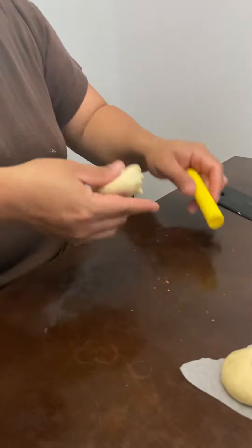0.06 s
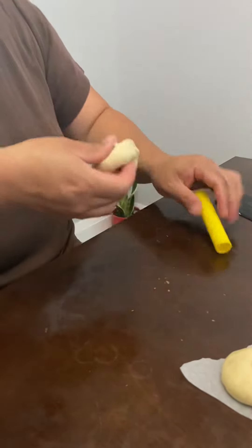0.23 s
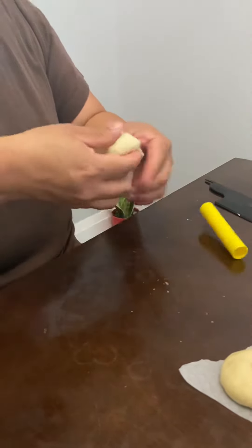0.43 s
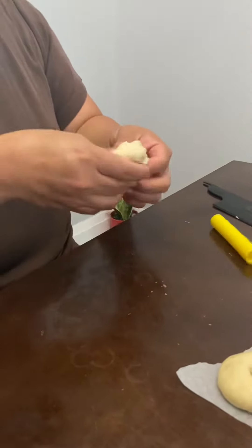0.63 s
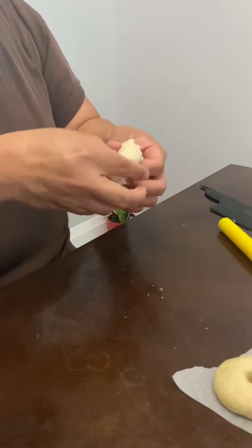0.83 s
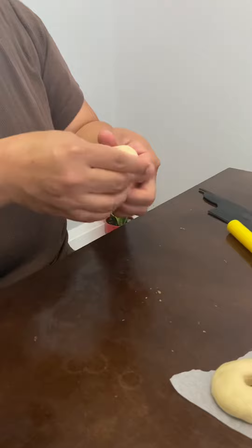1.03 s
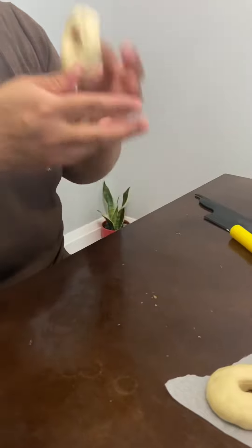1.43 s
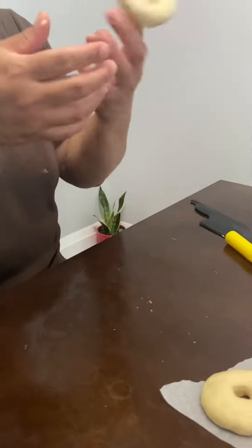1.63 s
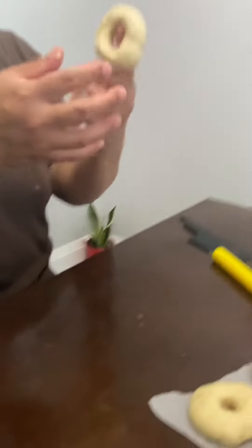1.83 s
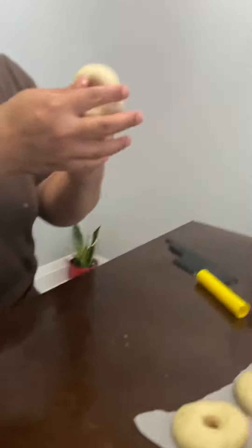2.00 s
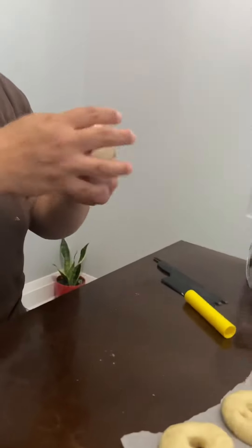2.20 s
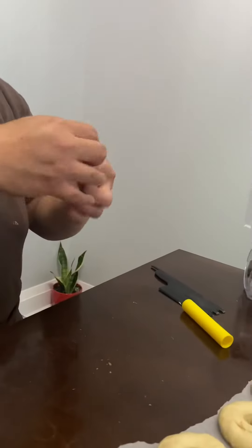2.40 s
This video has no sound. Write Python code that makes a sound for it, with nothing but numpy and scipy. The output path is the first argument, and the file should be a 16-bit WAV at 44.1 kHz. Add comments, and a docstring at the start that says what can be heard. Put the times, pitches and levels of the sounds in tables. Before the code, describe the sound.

A knife is set down on a wooden table and rocks with quickening clacks, its round handle rolling until it stops. Faint taps and a tiny sticky click of fingers on dough follow, in a small, humming room.

```python
"""Knife rocking on a wooden table

In a small, bare room, heard by a stereo microphone pair, a hard-handled knife is set down and rocks
ever faster until it lies still. Each contact thumps the tabletop, clacks the handle and rings the
blade; in between, the round handle rolls. Faint taps and fingers on dough follow over the room's hum."""
import sys
import numpy as np
from scipy import signal
from scipy.fft import rfft, irfft, next_fast_len
from scipy.io import wavfile
from scipy.ndimage import map_coordinates

SR = 44100
rng = np.random.default_rng(int(sys.argv[2]) if len(sys.argv) > 2 else 0)


def transcribe(u):
    """Save the signal u as a 16-bit wav file named by the first command-line argument.

    u: samples, shape (n,) or (channels, n), limited to [-1, 1]; the rate is SR.
    q: integer samples, one column per channel.
    """
    v = np.clip(np.atleast_2d(u).T, -1, 1)
    q = np.round(v * 32767).astype(np.int16)
    wavfile.write(sys.argv[1], SR, q)


N = 112454
HIT_SAMPLES = 32768


def amp(db):
    """Decibels to gain."""
    return 10 ** (np.asarray(db) / 20)


def unit(x):
    """Scale to rms 1."""
    return x / np.sqrt(np.mean(x ** 2) + 1e-20)


def along(points, hz):
    """Read a curve of (freq_hz, value) points on a log frequency axis."""
    freqs, values = np.transpose(points)
    return np.interp(np.log(hz + 1), np.log(np.abs(freqs) + 1), values)


def filtered(x, response):
    """Filter x by a gain given as a function of frequency."""
    n = x.shape[-1]
    padded = next_fast_len(n + 8192)
    return irfft(rfft(x, padded) * response(np.fft.rfftfreq(padded, 1 / SR)), padded)[..., :n]


def add(track, start_s, sound):
    """Mix a sound into the track."""
    part = track[..., round(start_s * SR):][..., :sound.shape[-1]]
    part += sound[..., :part.shape[-1]]


# How alike the room sounds at the two microphones: freq_hz, correlation
ROOM_COHERENCE = [(100, 1), (300, 0.92), (450, .9), (700, 0.2), (1200, 1), (2400, 0.38), (3600, 0.34),
                  (4400, .5), (5600, 1), (10000, .96)]
def stereo_noise(spectrum, samples):
    """Coloured noise, as alike left and right as the room makes it."""
    def mid_side_gains(hz):
        angle = np.arccos(np.clip(along(ROOM_COHERENCE, hz), -1, .999)) / 2
        return amp(along(spectrum, hz)) * [np.cos(angle), np.sin(angle)]
    mid, side = filtered(rng.standard_normal((2, samples)), mid_side_gains)
    return np.array([mid + side, mid - side])


# Ventilation in the background: freq_hz, relative_db
VENT_SPECTRUM = [(15, -46), (25, -24.5), (34, -9.5), (70, -7.5), (100, -12), (132, 2), (166, -10),
                 (200, -12.5), (260, -12.5), (344, -21.5), (427, -19), (530, -28), (700, -29.5),
                 (1370, -46), (2800, -55), (4500, -54.5), (7300, -63.5), (10500, -60), (13000, -67.5),
                 (16000, -77)]
# Hum lines of the room: pitch_hz, level_db
HUM_LINES = [(75, -64.5), (124, -57), (199, -66)]
def room_tone():
    """Low ventilation rumble with a few hum lines that waver in level and phase."""
    t = np.arange(N) / SR
    out = amp(-51) * unit(stereo_noise(VENT_SPECTRUM, N))
    for hz, db in HUM_LINES:
        waver_db, drift_rad = (map_coordinates(rng.standard_normal(64), [t * 6]) for _ in range(2))
        out += amp(db - waver_db) * np.sqrt(2) * np.sin(2 * np.pi * hz * t + drift_rad)
    return out


# Decay of the small, bare room: freq_hz, t60_s
ROOM_DECAY = [(120, 0.9), (450, .45), (1400, 0.46), (3600, 0.35), (6000, 0.37), (10000, .34), (16000, 0.48)]
# Colour of its tail at the microphones: freq_hz, relative_db
TAIL_SPECTRUM = [(120, 0), (420, -8), (750, -1.5), (1200, -6.5), (2200, 2), (3100, -5.5), (4400, -3),
                 (5100, -5), (5800, -9.5), (6600, -6), (7300, -13), (9200, -12.5), (12000, -12),
                 (13600, -10), (15200, -10), (16200, -16)]
def in_room(sound, build_s=.007, wall_delay_s=.012, wall_db=-13.5):
    """The direct sound, a reflection off one near wall and a diffuse tail."""
    _, _, bands = signal.stft(stereo_noise(TAIL_SPECTRUM, HIT_SAMPLES), SR, nperseg=256)
    hz = np.linspace(0, SR / 2, bands.shape[1])
    t = np.linspace(0, HIT_SAMPLES / SR, bands.shape[2])
    t60 = along(ROOM_DECAY, hz)[:, None]
    equal_energy = np.sqrt(2 * np.log(1000) / (t60 * SR))
    fade = amp(-60 * t / t60) * equal_energy * (1 - np.exp(-t / build_s))
    tail = signal.istft(bands * fade, SR, nperseg=256)[1]
    wet = signal.fftconvolve(sound, tail, axes=1)[:, :HIT_SAMPLES]
    add(wet, wall_delay_s, amp(wall_db) * sound)
    return sound + wet


def ring(modes, spread_rad, scatter_db=1.5, attack_s=.0002):
    """Struck modes, a little different at each blow; each reaches the two microphones out of step."""
    t = np.arange(HIT_SAMPLES) / SR
    hz, db, t60 = np.transpose(modes)[:, :, None]
    polarity = (-1) ** np.arange(len(hz))[:, None]
    strength = polarity * amp(db + scatter_db * rng.standard_normal(hz.shape))
    fade = strength * amp(-60 * t / t60) * (1 - np.exp(-t / attack_s))
    skew = spread_rad * rng.standard_normal(hz.shape)
    return np.array([np.sum(fade * np.sin(2 * np.pi * hz * t + side * skew), 0) for side in (1, -1)])


def burst(spectrum, t60_s, rise_s=.0003):
    """A quickly rising and dying puff of coloured noise, its energy set by its decay."""
    t = np.arange(HIT_SAMPLES) / SR
    fade = amp(-60 * t / t60_s)
    puff = stereo_noise(spectrum, HIT_SAMPLES) * fade * (1 - np.exp(-t / rise_s))
    return unit(puff) * np.sqrt(np.mean(fade ** 2))


# Hands brushing dough, barely reaching the microphones: middle_s, length_s, level_db
RUB_STROKES = [(1.32, 0.052, -86), (1.48, 0.1, -82.5), (2.116, 0.15, -83), (2.34, .1, -87.5),
               (2.456, 0.062, -84.5)]
# Colour of the rustle: freq_hz, relative_db
RUB_SPECTRUM = [(500, -11), (1200, -4), (2500, 4), (3600, -13.5), (7000, -11.5), (10500, -9), (15500, -13)]
def dough_rubs(grain_db=2.5, grains_per_s=150):
    """Hands rub the dough in soft swells of grainy noise."""
    t = np.arange(N) / SR
    strokes = sum(amp(db) * np.exp(-(2 * (t - middle_s) / length_s) ** 2)
                  for middle_s, length_s, db in RUB_STROKES)
    grain = amp(grain_db * map_coordinates(rng.standard_normal(2048), [t * grains_per_s]))
    return strokes * unit(grain * stereo_noise(RUB_SPECTRUM, N))


# Fingers on the dough: start_s, level_db
STICKY_CLICKS = [(1.710, -79.5), (1.7290, -52), (1.733, -68.5)]
# Colour of a click: freq_hz, relative_db
CLICK_SPECTRUM = [(500, -22.5), (4000, -21), (6000, -8), (9000, 0), (12000, -1), (16000, -15)]
def finger_clicks():
    """Fingers stick to the dough with tiny bright clicks."""
    out = np.zeros((2, N))
    for start_s, db in STICKY_CLICKS:
        add(out, start_s, in_room(amp(db) * burst(CLICK_SPECTRUM, t60_s=.0046)))
    return out


# Resonances of the wooden tabletop: pitch_hz
TABLETOP_HZ = [126, 160, 283, 351, 412, 470, 623, 739, 885]
# How each one rings: pitch_hz, relative_db, t60_s
TABLETOP_MODES = list(zip(TABLETOP_HZ, [-19, -18, -13, -11, -2, -7, -16, -16, -15],
                  [.12, .1, .11, .06, .05, .07, .09, .11, .05]))
def tabletop_thump():
    """A blow sets the low modes of the tabletop ringing."""
    return ring(TABLETOP_MODES, spread_rad=.15)


# Resonances of the hard handle: pitch_hz
HANDLE_HZ = [1099, 1200, 1365, 1436, 1532, 1612, 1830, 1920, 2195, 2471]
# How each one rings: pitch_hz, relative_db, t60_s
HANDLE_MODES = list(zip(HANDLE_HZ, [-9, -9, -6, -9, -11, -10, -9, -13, -14, -13],
                [.04, .04, .015, .035, .03, .035, .018, .035, .03, .03]))
def handle_clack():
    """The handle rings briefly as it meets the wood."""
    return ring(HANDLE_MODES, spread_rad=.5)


# Rumble of the handle on the table: freq_hz, relative_db
RUMBLE_SPECTRUM = [(40, -24.5), (90, -1), (160, -2), (210, -5.5), (300, 0.5), (460, -3.5), (600, -6),
                   (900, -12.5), (2500, -36), (8000, -69)]
def rolling(start_s=.235, stop_s=.82, fade_s=.015, jolts_per_s=190, scatter_db=4, growth_db_per_s=4):
    """The round handle rumbles on the wood; tiny random jolts keep tabletop and handle murmuring."""
    t = np.arange(N) / SR
    moving = np.clip(np.minimum(t - start_s, stop_s - t) / fade_s, 0, 1)
    jolts = (rng.random(N) < jolts_per_s / SR) * amp(scatter_db * rng.standard_normal(N))
    jolt_sound = amp(-50.5) * tabletop_thump() + amp(-44) * handle_clack()
    rumble_db = -44 + growth_db_per_s * (t - start_s)
    rumble = moving * amp(rumble_db) * unit(stereo_noise(RUMBLE_SPECTRUM, N))
    murmur = signal.fftconvolve((moving * jolts)[None], in_room(jolt_sound), axes=1)[:, :N]
    return rumble + murmur


# Modes of the blade and of the hollow clink: pitch_hz, relative_db, t60_s
BLADE_MODES = [(5130, -8, 0.028), (5500, -5.5, 0.021), (5817, 0, 0.034), (12200, -6.5, 0.012)]
CLINK_MODES = [(2890, -4, 0.021), (3440, -1.5, 0.018), (3810, -11.5, .02)]
# Noise of a contact, its woody body and its sharp tick: freq_hz, relative_db
WOOD_SPECTRUM = [(30, -39), (100, -17.5), (400, -1), (800, -5), (1300, 1), (2300, -8.5), (2900, -16),
                 (3600, -15), (4500, -16.5), (8000, -22.5), (16000, -44.5)]
TICK_SPECTRUM = [(1000, -15.5), (3000, -7), (4300, -10), (5500, 6.5), (6600, -4), (7200, -3), (9200, -1),
                 (10500, -4), (12000, 6), (13800, -3), (15300, -3.5), (16500, -21)]
# At the table, faint handling taps and the rocking knife in the foreground; each level is relative
# within its column: start_s, thump_db, clack_db, clink_db, blade_db, tick_db
HANDLING_TAPS = [(1.1105, -46, -50.5, -83, -75, -89), (1.1283, -38, -46, -60, -68, -78)]
KNIFE_CONTACTS = [(.1575, -28.5, -27.5, -69, -55.5, -48), (.2042, -30.5, -32.5, -50, -57, -44),
                  (.2258, -15, -16, -22.5, -12.5, -18.5), (.2290, -29.5, -16, -33, -20.5, -23),
                  (.2600, -33, -32, -49, -36, -43), (.2995, -41.5, -32.5, -33, -42.5, -39),
                  (.3362, -50, -45, -60, -45.5, -47), (.3462, -22.5, -16.5, -43, -39.5, -35.5),
                  (.3481, -20.5, -21, -26, -23, -21), (.4407, -33.5, -17, -31, -20.5, -20),
                  (.5185, -25.5, -17, -24, -29, -25.5), (.5815, -27.5, -21.5, -29, -35, -24.5),
                  (.6346, -22, -23, -31, -40.5, -30.5), (.6797, -24, -24.5, -35, -34, -29),
                  (.7165, -27, -28.5, -36.5, -30, -46), (.7453, -38, -33.5, -34, -59, -40.5),
                  (.7686, -33.5, -34, -38, -49, -46.5), (.7835, -44, -29.5, -56, -44, -45.5),
                  (.7940, -33, -40, -68, -51.5, -59), (.8030, -46.5, -45.5, -51, -48, -64)]
def knocks(contacts):
    """Every contact starts with a hard tick and excites tabletop, handle and blade."""
    out = np.zeros((2, N))
    for start_s, thump_db, clack_db, clink_db, blade_db, tick_db in contacts:
        thump = amp(thump_db) * tabletop_thump()
        clack = amp(clack_db - .5) * handle_clack()
        wood = amp(clack_db + 1) * burst(WOOD_SPECTRUM, t60_s=.014, rise_s=.0009)
        clink = amp(clink_db) * ring(CLINK_MODES, spread_rad=.5)
        blade = amp(blade_db) * ring(BLADE_MODES, spread_rad=.15)
        tick = amp(tick_db + 5) * burst(TICK_SPECTRUM, t60_s=.0078)
        add(out, start_s, in_room(thump + clack + wood + clink + blade + tick))
    return out


def scene():
    """The rocking and rolling knife, the handling and the room."""
    rocking = knocks(KNIFE_CONTACTS)
    handling = knocks(HANDLING_TAPS) + dough_rubs() + finger_clicks()
    return rocking + handling + room_tone() + rolling()


# Phase across the microphone pair: freq_hz, left_lead_rad
MIC_PHASE = [(0, 0), (1500, 0), (2400, .8), (4000, .8), (5100, .2), (6000, 1.5), (7000, 3), (8000, 3.6),
             (10000, 6), (12000, 7.8), (14000, 9.8), (16000, 12)]
# Balance of the pair: freq_hz, left_minus_right_db
MIC_BALANCE = [(50, 0.5), (130, -2), (280, -3.5), (420, -6), (650, -2.5), (1100, -1.5), (1600, 0.5),
               (4000, -1.25), (16000, 1)]
def record(dry, top_hz=16700):
    """The two microphones differ in level and phase; the treble ends steeply at the band limit."""
    sides = np.array([[.5], [-.5]])
    def response(hz):
        balance = amp(sides * along(MIC_BALANCE, hz))
        phase = np.exp(1j * sides * along(MIC_PHASE, hz))
        return balance * phase / (1 + (hz / top_hz) ** 120)
    return filtered(dry, response)


dry = scene()
out = record(dry)
transcribe(out)
```